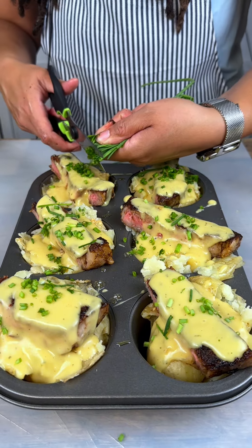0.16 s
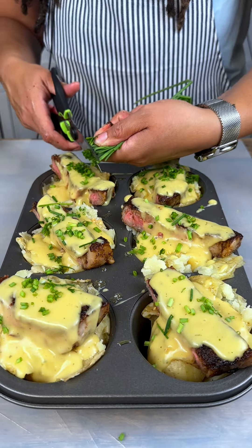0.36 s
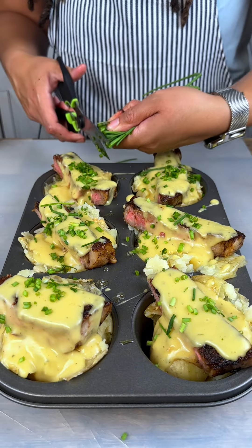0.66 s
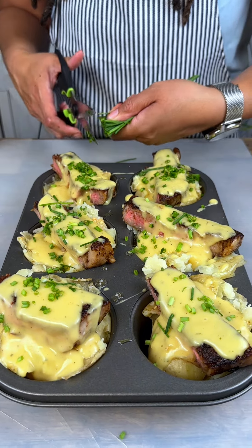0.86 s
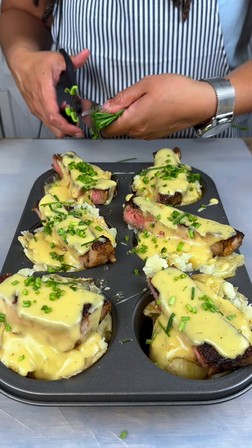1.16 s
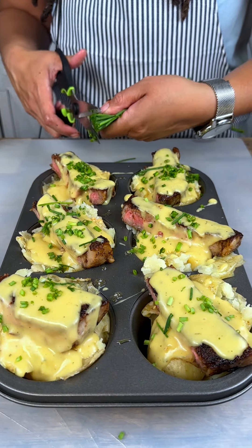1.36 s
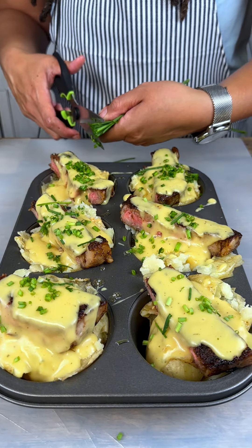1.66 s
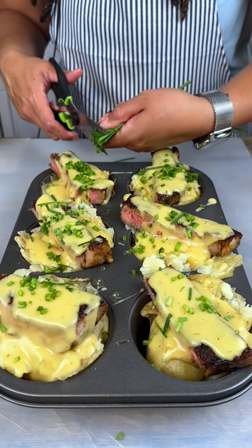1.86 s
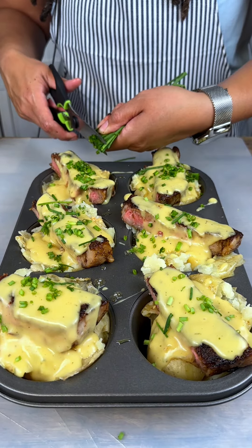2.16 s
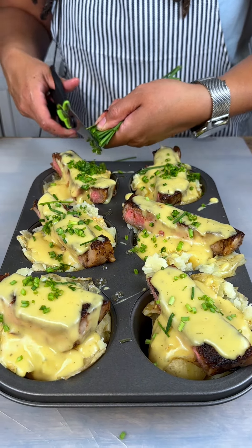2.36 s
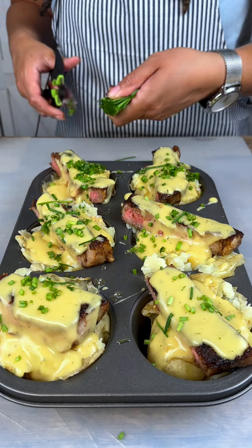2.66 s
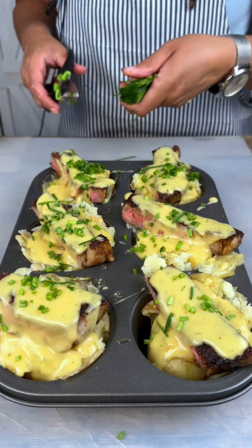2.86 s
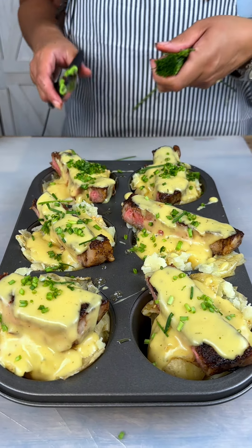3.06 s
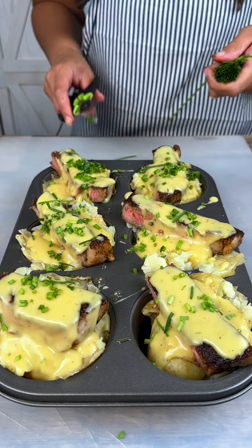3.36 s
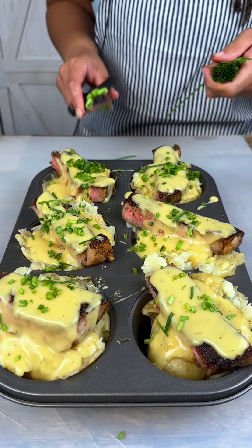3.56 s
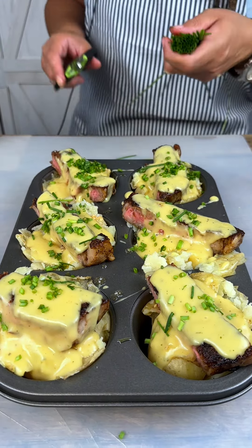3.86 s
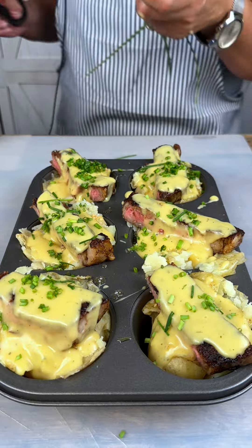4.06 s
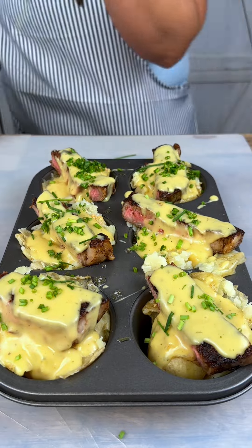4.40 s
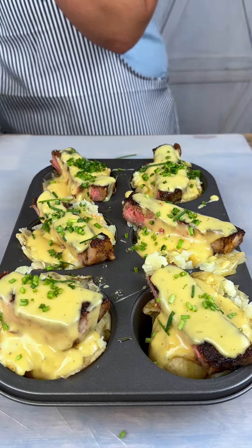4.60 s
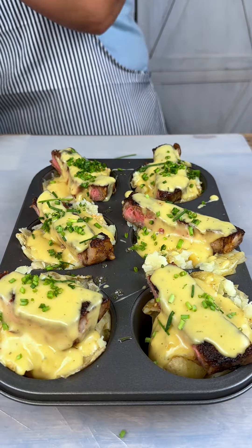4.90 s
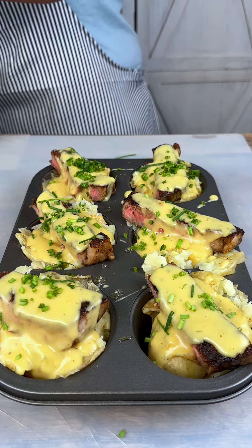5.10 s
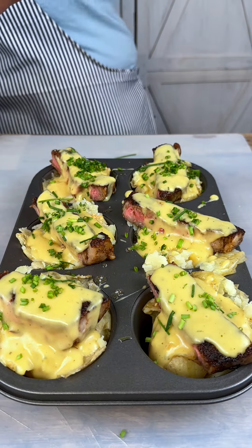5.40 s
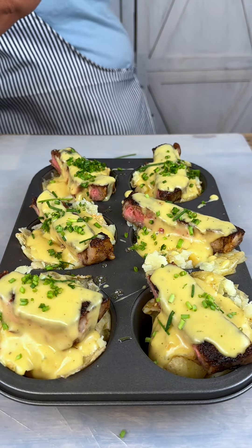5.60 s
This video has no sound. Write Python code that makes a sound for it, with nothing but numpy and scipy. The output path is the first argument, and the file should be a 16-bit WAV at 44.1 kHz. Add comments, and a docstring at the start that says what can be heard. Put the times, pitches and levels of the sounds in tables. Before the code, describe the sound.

Scissors crunch through a bunch of chives in a few crisp snips, then get set down with clattering knocks over a low fan hum.

```python
"""Kitchen scissors crunch through a bunch of chives, close to the microphone, while a fan hums in a small kitchen.
Each cut is a thick stream of tiny random clicks, and the thickest stalks snap as short bursts of noise.
The hands move off: slow air sways and bumps against the microphone, with a fine crackly rubbing of short ticks.
Then the scissors are set down on the counter: bursts and ringing tones make the knocks, clicks make the slides.
The fan is a set of slightly unsteady tones over shaped noise."""
import sys
import numpy as np
from scipy import signal
from scipy.fft import rfft, irfft, next_fast_len
from scipy.io import wavfile
from scipy.ndimage import uniform_filter1d, map_coordinates

SR = 44100
rng = np.random.default_rng(int(sys.argv[2]) if len(sys.argv) > 2 else 0)


def log_audio(samples):
    """Write samples as a 16-bit WAV file to the path given in sys.argv[1]."""
    # one column per channel
    frames = np.atleast_2d(samples).T
    # limit to full scale, then quantise
    limited = np.clip(frames, -1, 1)
    pcm = np.round(limited * 32767).astype(np.int16)
    wavfile.write(sys.argv[1], SR, pcm)


N = 253158
TIME = np.arange(N) / SR  # seconds
HIT_TIME = TIME[:SR // 3]  # the clock of one short hit

# the blades closing through the bunch:
# (start [s], end [s], level when closed [dB rms], share of hollow crunch [dB])
CUTS = [(0.037, .1, -40, -17), (0.308, 0.356, -34.5, -4), (1.88, 2.113, -45.5, -11),
        (2.148, 2.18, -30, -0.5)]
# smooth grazing hiss: the open blades on the stalks, and around 3.25 s and 3.55 s the rubbing hands: (middle
# [s], half length [s], level [dB rms])
GRAZES = [(1.05, 0.2, -64.5), (1.72, 0.17, -58), (1.81, 0.047, -50), (2.0, 0.12, -50.5), (2.72, 0.28, -64),
          (3.25, .05, -65), (3.55, 0.2, -58)]
# the thickest stalks snapping: (time [s], level [dB])
SNAPS = [(0.026, -25), (0.0512, -25), (0.072, -26), (0.1039, -18), (0.3328, -24), (1.8574, -13),
         (1.8972, -19), (1.93, -23.5), (1.9804, -22), (2.023, -22.5), (2.101, -21.5), (2.137, -13.5),
         (2.1448, -19)]
# tone colour of blades on stalks: (frequency [Hz], relative level [dB])
BLADE_COLOUR = [(1500, -7), (4000, -4.5), (5500, -1), (7100, -0.5), (8300, -4), (9300, -5.5), (11500, -10),
                (13000, -10), (14300, -8), (16000, -6)]
# tone colour of small cells bursting: (frequency [Hz], relative level [dB])
CELL_COLOUR = [(300, -19), (800, -15), (1700, 4), (4000, -2), (7000, -7), (11000, -9.5), (16000, -12)]
# tone colour of the hollow stalk tubes: (frequency [Hz], relative level [dB])
TUBE_COLOUR = [(500, -26), (1200, -15), (1650, 4.5), (2300, 0), (3000, -8), (3800, -4.5), (5200, -26),
               (16000, -28)]
# tone colour of a snapping stalk: (frequency [Hz], relative level [dB])
STALK_COLOUR = [(400, -11), (1100, -13), (1650, -0.5), (2200, 4.5), (3000, -2.5), (3900, -5), (5800, -5.5),
                (7500, -8.5), (11000, -14), (14500, -10), (16000, -7)]
CUT_ATTACK_S, CUT_RELEASE_T60_S = 0.024, 0.079  # the blades bite and let go
CUT_BUILD_DB = 3.5  # the blades press harder as they close
CLUMP_RATE, CLUMP_DB = 300, 2.5  # the crunch comes stalk by stalk: knots a second, depth
SNAP_T60_S, SKIN_LEAD_S, SKIN_DB = 0.015, 0.0037, -9.5  # the skin cracks a little earlier and weaker


def snips():
    """The blades graze the bunch, then burst clumps of small cells; whole stalks give way with a snap."""
    clumps = unit(amp(CLUMP_DB * np.clip(wobble(CLUMP_RATE), -2, 1.6)))
    graze = colour(swells(GRAZES) * grains(rate=1500, spread_db=6.5), BLADE_COLOUR)
    cells, tubes = np.zeros(N), np.zeros(N)
    for start, end, db, hollow_db in CUTS:
        still_open = np.clip((end - TIME) / (end - start), 0, 1)
        bite = stroke(start, CUT_ATTACK_S, end, CUT_RELEASE_T60_S)
        pressure = amp(db - CUT_BUILD_DB * still_open) * bite * clumps
        cells += pressure
        tubes += amp(hollow_db) * pressure  # a thick bunch crunches lower
    cut = colour(cells * grains(rate=6100, spread_db=2.5), CELL_COLOUR)
    cut += colour(tubes * grains(rate=2200, spread_db=5.5), TUBE_COLOUR)
    for s, db in SNAPS:
        add(cut, s - SKIN_LEAD_S, amp(db + SKIN_DB) * burst(SNAP_T60_S, STALK_COLOUR))
        snap = burst(SNAP_T60_S, STALK_COLOUR) + amp(-5) * burst(SNAP_T60_S, TUBE_COLOUR)
        add(cut, s + 0.0005, amp(db) * snap)
    return graze + cut


# the hands rubbing close to the microphone:
# (middle [s], half length [s], crackle level [dB rms], low scuffing level [dB rms])
RUBS = [(2.635, 0.045, -55.5, -46), (2.926, 0.12, -63, -40), (3.336, 0.12, -56, -32.5),
        (3.512, 0.043, -44.5, -28.5), (3.677, 0.046, -47, -26.5), (3.845, 0.053, -48.5, -29.5),
        (4.245, 0.2, -59, -40.5), (5.306, .2, -60, -37)]
# the loudest crackles: (time [s], level [dB], pitch [Hz])
CRACKLES = [(1.7795, -23.5, 7100), (1.8396, -23, 6750), (2.613, -34, 4200), (2.7567, -35, 3300),
            (3.3644, -21, 5530), (3.4767, -28, 5300), (3.5227, -28, 4800), (3.6618, -27, 5760),
            (3.693, -27, 5600), (3.8, -26, 6940), (3.8383, -25, 5700), (3.8658, -22.5, 5800),
            (3.8758, -25.5, 5500), (3.9151, -28.5, 2770), (4.0454, -28, 5500)]
# soft pats: (time [s], relative level [dB])
PATS = [(0.647, -16.5), (2.803, -14.5), (2.854, -20.5), (2.912, -12.5), (3.007, -17), (3.496, -15),
        (3.672, -14.5), (3.801, -11.5)]
# tone colour of the crackle: (frequency [Hz], relative level [dB])
CRACKLE_COLOUR = [(1500, -32), (2200, -0.5), (2800, 4.5), (3800, -7), (5300, -3.5), (7300, -5),
                  (9000, -5.5), (12000, -8), (16000, -21)]
# tone colour of pats and scuffing: (frequency [Hz], relative level [dB])
PAT_COLOUR = [(110, -7.5), (250, -4), (400, 2), (650, -12), (950, -13.5), (1400, -27.5), (2500, -41.5),
              (8000, -55)]
STRAY_RATE, STRAY_DB = 240, -2.5  # higher-pitched slips a second, and their level against the rubbing


def rubbing():
    """Tiny slips close by: dry pitched ticks over low scuffing and soft pats."""
    ticks = crackle(rate=900, spread_db=3.5, middle_hz=5200, scatter=0.45)
    ticks = unit(colour(ticks, CRACKLE_COLOUR))
    strays = crackle(rate=STRAY_RATE, spread_db=4, middle_hz=5900, scatter=.16)
    slipping = swells([(s, width, db) for s, width, db, _ in RUBS])
    scuffing = swells([(s, width, db) for s, width, _, db in RUBS])
    out = slipping * (ticks + amp(STRAY_DB) * strays)
    out += scuffing * colour(grains(rate=700, spread_db=3.5), PAT_COLOUR)
    for s, db, hz in CRACKLES:
        edge = amp(-10) * tick(10800, cycles=.4)  # the sudden release reaches higher than the ring
        add(out, s, amp(db) * (tick(hz, cycles=1.3) + edge))
    for s, db in PATS:
        add(out, s, amp(db + 1.5) * burst(0.031, PAT_COLOUR))
        add(out, s, amp(db - 21) * burst(0.0026, CRACKLE_COLOUR))
    return out


def crackle(rate, spread_db, middle_hz, scatter):
    """A random train of ticks, each of its own pitch and size, rms 1."""
    start = rng.integers(0, N, int(rate * N / SR))
    pitch, size = np.clip(rng.standard_normal((2, len(start))), -2, 2)
    ticks = amp(spread_db * size)[:, None] * tick(middle_hz * np.exp(scatter * pitch), cycles=0.66)
    places = start[:, None] + np.arange(ticks.shape[1])
    return unit(np.bincount(places.ravel(), ticks.ravel(), N)[:N])


def tick(hz, cycles):
    """A tiny resonance, peaking near 1, that swells and dies within a few cycles."""
    turns = np.multiply.outer(hz, TIME[:256])
    age = turns / cycles
    return age * np.exp(1 - age) * np.sin(2 * np.pi * turns)


# things put down on the counter: (time [s], level [dB], crack decay t60 [s], counter share [dB],
# steel share [dB], first flight [s], rattle against the knock [dB])
KNOCKS = [(4.6636, -11.5, 0.027, 8, -12, 0.0051, -7), (4.7505, -38.5, .05, 22, -20, .028, -13),
          (4.927, -16, 0.015, -5, -22, 0.0076, -6), (5.020, -28.5, .013, -25, 3, .01, -34),
          (5.122, -13.5, 0.023, -32, -0.5, .014, -3.5), (5.474, -23.5, 0.0056, -26, -18, .028, -5.5),
          (5.522, -18, 0.0081, 2, -26, .013, -30), (5.622, -4.5, 0.0044, -12, -18, 0.0065, -30)]
# things pushed along the counter: (start [s], level [dB rms], rise [s], decay t60 [s])
SLIDES = [(4.665, -36, .01, 0.41), (4.74, -39, 0.067, 0.7), (4.92, -44, 0.016, .15),
          (5.125, -40.5, 0.019, 0.78), (5.42, -40.5, 0.15, 1.6)]
# something catches as it slides: (middle [s], half length [s], pitch [Hz], peak level [dB])
SQUEAK = (4.881, 0.03, 2728.5, -46)
# tone colour of sliding: (frequency [Hz], relative level [dB])
SLIDE_COLOUR = [(300, 2), (600, 6), (1100, -5.5), (1500, 0), (2300, 4), (3200, -3.5), (5000, -10),
                (8000, -15), (12000, -19), (16000, -23)]
# tone colour of hard things touching: (frequency [Hz], relative level [dB])
CONTACT_COLOUR = [(300, -17), (1000, -1), (1550, 3.5), (2200, 5.5), (2700, -2.5), (3300, 2.5), (4100, -1.5),
                  (6000, -3.5), (8500, -7.5), (12000, -14), (16000, -19)]
TOUCH_DB, BOUNCE_LOSS_DB = -1, 2.5  # first touch against the rattle; loss at each bounce
FLIGHT_SHRINK = 0.57  # length of each flight over the last


def counter():
    """Hard things touch, knock and rattle to rest on the worktop, and slide in between."""
    push = sum(amp(db) * stroke(s, rise, s + rise, t60) for s, db, rise, t60 in SLIDES)
    uneven = amp(1.6 * wobble(60))
    out = colour(push * uneven * grains(rate=1800, spread_db=1), SLIDE_COLOUR)
    s, width, hz, db = SQUEAK
    out += swells([(s, width, db)]) * np.sin(2 * np.pi * hz * TIME)
    for s, db, t60, counter_db, steel_db, flight, rattle_db in KNOCKS:
        add(out, s - flight, amp(db + rattle_db + TOUCH_DB) * burst(0.02, CONTACT_COLOUR))
        add(out, s, amp(db) * contact(t60, counter_db, steel_db))
        delays = np.cumsum(flight * FLIGHT_SHRINK ** np.arange(3))
        for k, delay in enumerate(delays):
            bounce_gain = amp(db + rattle_db - BOUNCE_LOSS_DB * k)
            add(out, s + delay, bounce_gain * contact(t60, counter_db, steel_db))
    return out


# tone colour of the worktop's thud: (frequency [Hz], relative level [dB])
WORKTOP_COLOUR = [(150, 2), (350, -5), (580, 2.5), (850, -3.5), (1150, -8.5), (1600, -2), (2100, -2),
                  (2700, -14), (3300, -9), (5000, -19), (9000, -43), (16000, -50)]
# ringing tones of the counter: (frequency [Hz], relative level [dB], decay t60 [s])
COUNTER_MODES = [(487, 2, .14), (525, 0, .13), (640, 5, .1), (743, 1, .11), (822, 1, .15), (969, -10, .16),
                 (1320, -5, .1), (1560, -6, 0.1), (1665, -3, 0.09), (1917, -1, 0.12), (2163, -6, 0.11),
                 (2260, -10, 0.11)]
# ringing tones of the steel blades: (frequency [Hz], relative level [dB], decay t60 [s])
STEEL_MODES = [(2988, -8, .09), (3226, 0, .07), (3300, -2, .035), (3388, -1, .06), (3476, -4, .035),
               (6204, -15, .06)]


def contact(t60, counter_db, steel_db):
    """A crack, with the worktop's thud and the blades' short ring under it."""
    thud = amp(-4) * burst(.045, WORKTOP_COLOUR) + amp(-25) * ring(COUNTER_MODES, attack=.001)
    blades = amp(-14) * ring(STEEL_MODES, attack=.0004)
    return burst(t60, CONTACT_COLOUR) + amp(counter_db) * thud + amp(steel_db) * blades


def ring(modes, attack):
    """A solid thing struck: its own tones die away, each at a freshly drawn strength."""
    waves = np.zeros(len(HIT_TIME))
    for hz, db, t60 in modes:
        strength = amp(db + 2 * rng.standard_normal())
        waves += strength * fade(HIT_TIME, t60) * np.sin(2 * np.pi * (hz * HIT_TIME + rng.random()))
    return waves * (1 - np.exp(-HIT_TIME / attack))


# air stirred by the moving body: (time [s], relative level [dB])
SWAY = [(0, -28), (2.2, -25.5), (2.9, -15), (3.6, -14), (4.05, -8), (4.6, -19.5), (5.74, -22.5)]
# low flutter of air on the microphone: (middle [s], half length [s], level [dB rms])
FLUTTERS = [(1.35, 0.2, -30), (3.0, .1, -32), (3.32, 0.11, -26.5), (3.55, 0.17, -23.5), (4.05, 0.25, -29),
            (5.35, 0.23, -33.5)]
# sudden pushes on the microphone: (time [s], signed height before decay, rise [s], decay to 1/e [s])
BUMPS = [(0.642, -0.28, 0.0016, 0.007), (2.799, -0.9, 0.0045, 0.032), (3.359, 0.86, 0.014, 0.18),
         (4.212, 0.97, 0.0036, 0.0026)]
# tone colour of the flutter: (frequency [Hz], relative level [dB])
FLUTTER_COLOUR = [(8, -16.0), (20, 0.0), (40, -0.5), (80, -9), (160, -22.5), (600, -63), (3000, -110)]


def draught():
    """Air leans very slowly on the microphone, flutters, and bumps it a few times."""
    sway_db, = curves(SWAY)
    out = amp(sway_db - 1.0) * unit(np.tanh(1.5 * wobble(25)))
    out += swells(FLUTTERS) * colour(rng.standard_normal(N), FLUTTER_COLOUR)
    for s, height, rise, fall in BUMPS:
        push = np.sin(np.pi / 2 * np.clip(HIT_TIME / rise, 0, 1)) ** 2
        to_zero = 1 - HIT_TIME / HIT_TIME[-1]  # ends without a click
        add(out, s, height * push * np.exp(-HIT_TIME / fall) * to_zero)
    return out


# the fan motor and its housing: (frequency [Hz], level [dB rms])
HUM = [(58.2, -40), (116.4, -49), (140, -46), (174.6, -40.5), (232.8, -32.5), (291, -46.5), (407.5, -44),
       (484.5, -49.5)]
# how the hum's strength moves: (time [s], relative level [dB])
HUM_LEVEL = [(0, -30.5), (4.1, -32), (4.6, -35), (5.74, -37.5)]
# thin motor whines: (start [s], end [s], frequency [Hz], level [dB rms])
WHINES = [(-0.5, 4.4, 1105, -54), (0, 4.2, 1222, -54.5), (4.1, 4.7, 1281, -54), (0, 6.6, 4371, -72)]
# tone colour of the moving air: (frequency [Hz], relative level [dB])
FAN_AIR_COLOUR = [(15, -26.5), (25, -2), (40, -1.5), (63, -7), (102, -13.5), (185, -12), (236, -11.5),
                  (277, -18), (335, -16), (394, -17), (503, -16), (677, -21.5), (1100, -27.5),
                  (1370, -30.5), (2550, -37), (16000, -69.5)]
FAN_AIR_DB = -32  # rms


def fan():
    """The motor and housing hum in steady tones, thin whines come and go, and moved air rushes."""
    level_db, = curves(HUM_LEVEL)
    hum = sum(amp(db) * tone(hz, drift_hz=0.39, waver_db=1.48) for hz, db in HUM)
    hum = unit(amp(level_db)) * hum
    whine = np.zeros(N)
    for start, end, hz, db in WHINES:
        switch = uniform_filter1d(1.0 * (TIME > start) * (TIME < end), size=2048)  # softened edges
        whine += amp(db) * tone(hz, drift_hz=1.22, waver_db=1.0) * switch
    air = amp(FAN_AIR_DB) * colour(rng.standard_normal(N), FAN_AIR_COLOUR)
    return hum + whine + air


def tone(hz, drift_hz, waver_db):
    """A slightly unsteady tone of rms 1."""
    turns = np.cumsum(hz + drift_hz * wobble(5)) / SR + rng.random()
    return unit(np.sin(2 * np.pi * turns) * amp(waver_db * wobble(7)))


# how long the room rings: (frequency [Hz], decay t60 [s])
KITCHEN_DECAY = [(200, 0.68), (2000, 0.16), (7000, 0.28), (15000, 0.14)]


def kitchen(x):
    """The walls' answer: a noise tail in which each frequency dies at its own speed."""
    hz, t, z = signal.stft(rng.standard_normal(SR // 2), SR, nperseg=256)
    dying = z * fade(t, along(KITCHEN_DECAY, hz)[:, None])
    tail = signal.istft(dying, SR, nperseg=256)[1]
    tail = tail * (1 - np.exp(-TIME[:len(tail)] / 0.0048))  # echoes build up gently
    return signal.fftconvolve(x, tail / np.linalg.norm(tail))[:N]


def burst(t60, spectrum):
    """One short crack of dying noise that peaks near 1."""
    shape = fade(HIT_TIME, t60)
    crack = colour(rng.standard_normal(len(HIT_TIME)) * shape, spectrum, size=1024)
    return .5 * crack * np.linalg.norm(shape) / np.linalg.norm(crack)


def grains(rate, spread_db):
    """Random tiny clicks of uneven size, rate a second, rms 1."""
    sizes = amp(spread_db * np.clip(rng.standard_normal(N), -2, 2)) * rng.choice([-1, 1], N)
    return unit(sizes * (rng.random(N) < rate / SR))


def swells(rows):
    """Gain that swells and fades, from (middle [s], half length [s], level [dB]) rows."""
    return sum(amp(db) * np.exp(-.5 * ((TIME - s) / width) ** 2) for s, width, db in rows)


def stroke(start, rise, end, t60):
    """Gain that rises from start, holds until end, then dies away."""
    return np.clip((TIME - start) / rise, 0, 1) * fade(np.maximum(TIME - end, 0), t60)


def colour(x, spectrum, size=8192):
    """x through a filter of unit energy with this spectrum, which never sounds ahead of its input."""
    # folding the cepstrum forward in time gives the minimum-phase filter
    cepstrum = irfft(np.log(amp(along(spectrum, np.fft.rfftfreq(size, 1 / SR)))))
    cepstrum[1:size // 2] *= 2
    cepstrum[size // 2 + 1:] = 0
    response = irfft(np.exp(rfft(cepstrum)))
    return signal.fftconvolve(x, response / np.linalg.norm(response))[:len(x)]


def wobble(rate):
    """A smooth random curve of rms 1, rate knots a second."""
    knots = rng.standard_normal(int(N * rate / SR) + 4)
    return unit(map_coordinates(knots, [TIME * rate], mode="reflect"))


def fade(t, t60):
    """Decay by 60 dB in t60 seconds."""
    return 1000.0 ** (-t / np.maximum(t60, 1e-4))


def add(track, s, sound):
    """Mix a sound into the track at time s."""
    start = max(round(s * SR), 0)
    track[start:start + len(sound)] += sound[:max(N - start, 0)]


def along(points, hz):
    """Read a curve of (frequency [Hz], value) points on a log axis."""
    f, v = np.transpose(points)
    return np.interp(np.log(hz + 1), np.log(f + 1), v)


def curves(rows):
    """One value per sample for each column after the time."""
    s, *cols = np.transpose(rows)
    return [np.interp(TIME, s, c) for c in cols]


def amp(db):
    """Decibels to gain."""
    return 10 ** (np.asarray(db) / 20)


def unit(x):
    """x at rms 1."""
    return x / np.sqrt(np.mean(x ** 2) + 1e-20)


def scene():
    """The snips are near and fairly dry; the counter is farther off and gets more room sound."""
    near, far = snips(), counter()
    room = kitchen(amp(-12.0) * near + amp(-9) * far)
    return (near + far + room + rubbing() + draught() + fan())[None]


TOP_HZ = 15900  # band limit


def record(dry):
    """The microphone's signal keeps almost nothing above its band limit."""
    size = next_fast_len(N + SR // 2)
    passed = 1 / (1 + (np.fft.rfftfreq(size, 1 / SR) / TOP_HZ) ** 200)
    return irfft(rfft(dry, size) * passed, size)[:, :N]


dry = scene()
out = record(dry)
log_audio(out)
```